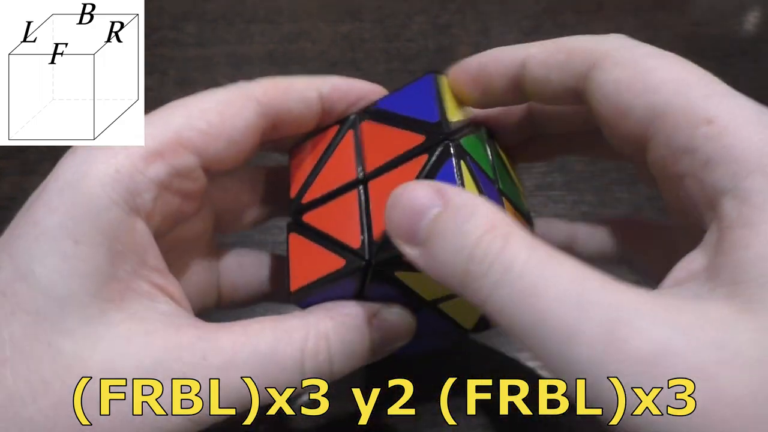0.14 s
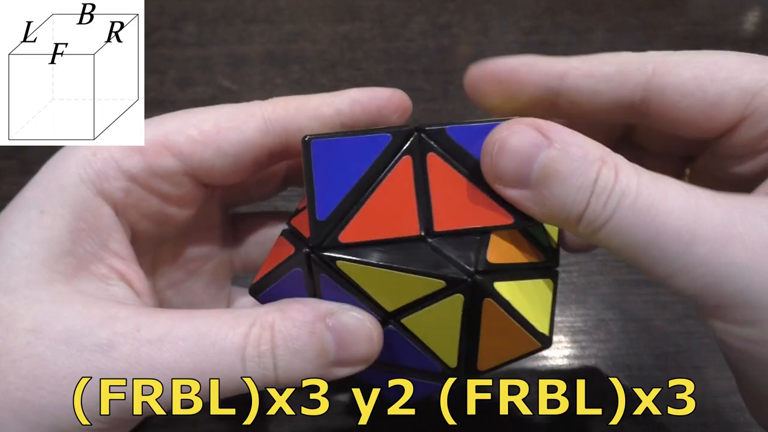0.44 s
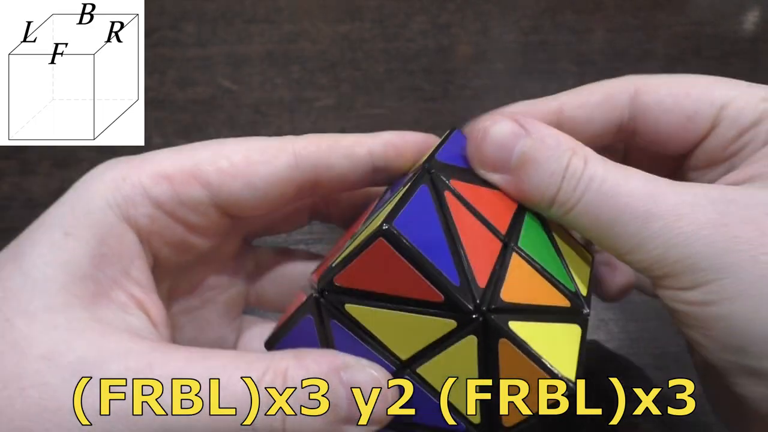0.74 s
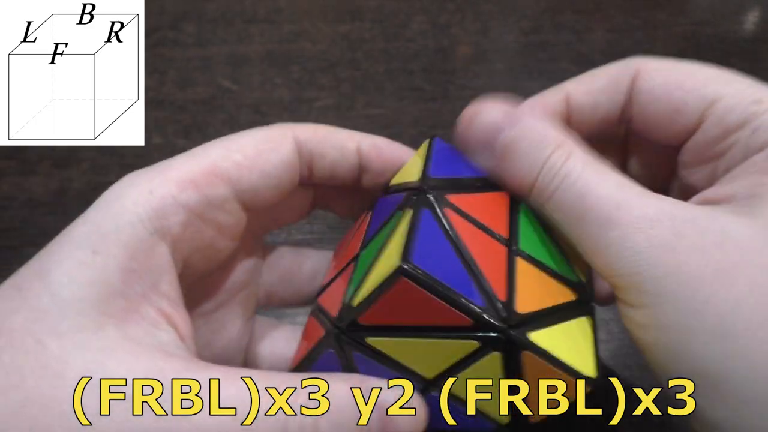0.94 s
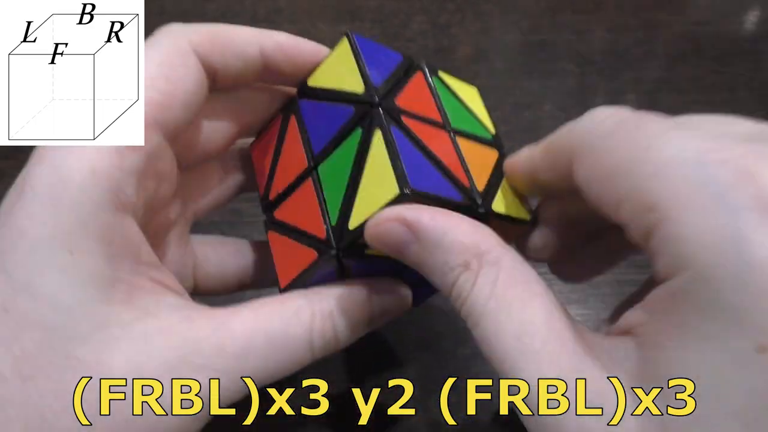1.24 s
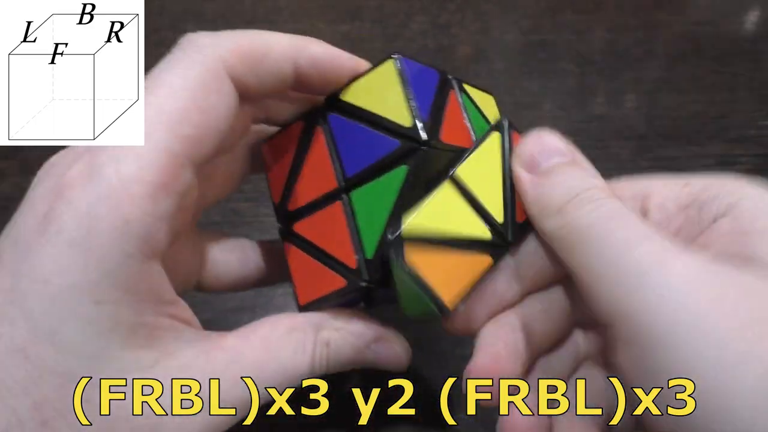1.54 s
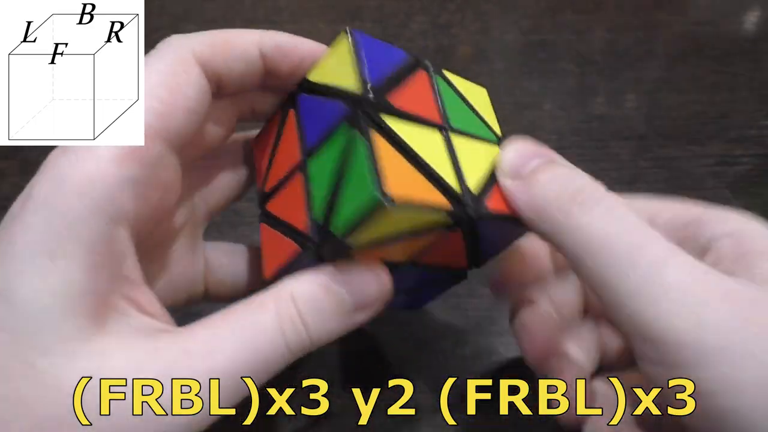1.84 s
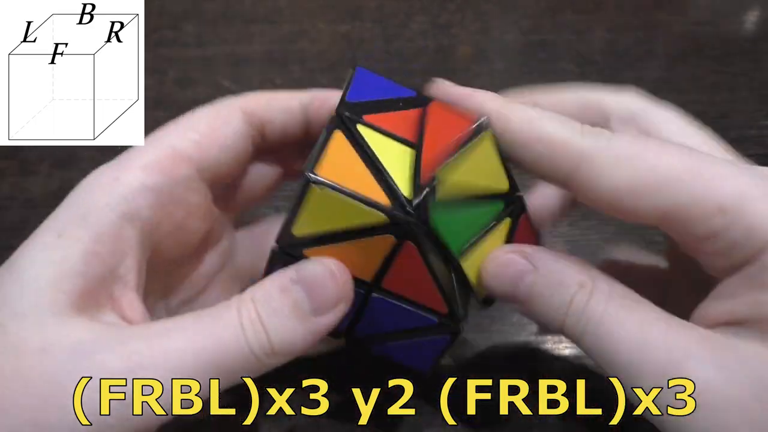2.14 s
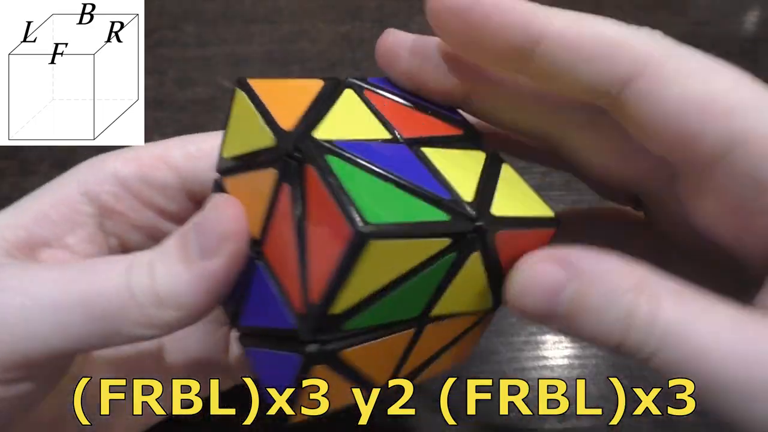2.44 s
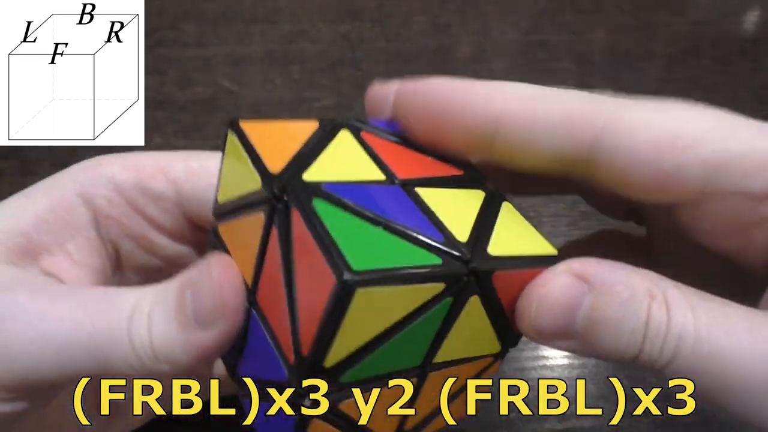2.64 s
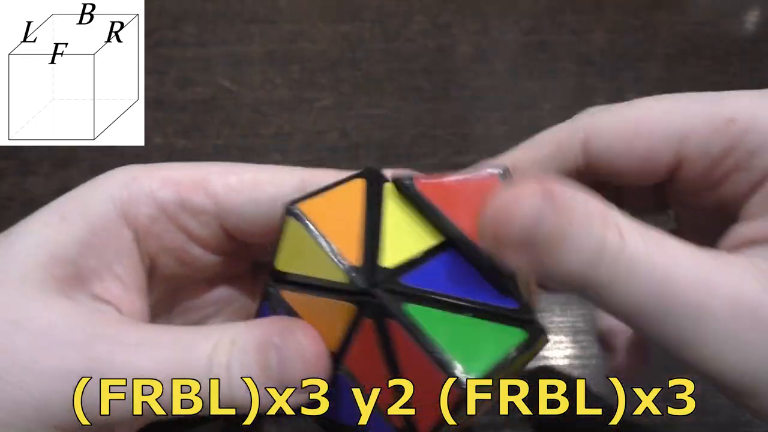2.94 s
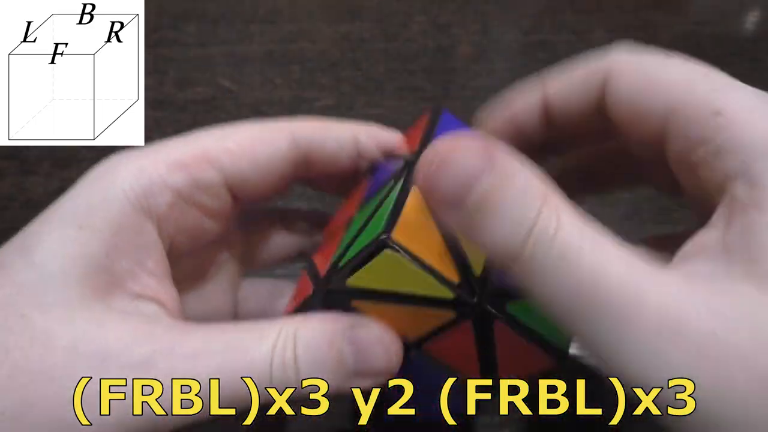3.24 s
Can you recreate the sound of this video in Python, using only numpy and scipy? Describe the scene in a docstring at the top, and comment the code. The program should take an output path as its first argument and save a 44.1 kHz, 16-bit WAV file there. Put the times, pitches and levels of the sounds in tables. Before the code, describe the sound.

A plastic twisty puzzle clacks and rattles in quick, uneven runs as hands turn it close to the microphone. Its sliding pieces scrape grittily, with a few tiny spring pings, over a quiet room's faint hiss and hum.

```python
"""Short chattering clacks and a gritty rattle: hands turn a plastic twisty puzzle, close by in a quiet room.
Pieces clack over each other; each chatter of tiny impacts rings their hollow bodies and sharp edges.
Sliding faces catch, rub and squeak thinly. Now and then a spring rings until a piece damps it.
Underneath, faint room hiss and mains hum, which drop after the loudest clack."""
import sys
import numpy as np
from scipy import signal
from scipy.fft import rfft, irfft
from scipy.io import wavfile
from scipy.ndimage import uniform_filter1d

SR = 44100
rng = np.random.default_rng(int(sys.argv[2]) if len(sys.argv) > 2 else 0)


def put_to_file(sound):
    """Save the sound as 16-bit audio at rate SR, in the file named by the first command-line argument."""
    columns = np.atleast_2d(sound).T  # one column per channel
    safe = np.clip(columns, -1, 1)
    whole_steps = np.round(safe * 32767)
    wavfile.write(sys.argv[1], SR, whole_steps.astype(np.int16))


N = 149940

# pieces clacking: start_s, body_db, edge_db
CLACK_HITS = [(0.0947, -30.5, -33.5), (0.1482, -32, -49), (0.2304, -15.5, -17.5), (0.2498, -20.5, -26),
              (0.2569, -18.5, -12.5), (0.2666, -11.5, -19.5), (0.3594, -34, -34), (0.3718, -26.5, -28),
              (0.4111, -23, -27), (0.448, -17.5, -35), (0.452, -18, -25), (0.4575, -21, -29),
              (0.495, -25, -34), (0.5352, -24.5, -32.5), (0.59, -18, -26), (0.5982, -25, -24.5),
              (0.652, -24, -43), (0.6662, -23, -21.5), (0.7518, -32, -35), (0.7706, -20.5, -33.5),
              (0.86, -24.5, -35), (0.8715, -23.5, -31), (0.8821, -18.5, -24.5), (1.0377, -14.5, -18),
              (1.0842, -23, -35.5), (1.1419, -40, -31), (1.3018, -41.5, -58), (1.3529, -24, -33.5),
              (1.3716, -25, -28.5), (1.4021, -18.5, -30), (1.423, -16.0, -21.5), (1.449, -24.5, -35),
              (1.476, -23.5, -32), (1.507, -23.5, -38), (1.544, -11, -15.5), (1.5565, -17, -22),
              (1.6362, -21, -25), (1.7385, -20, -25), (1.756, -21, -27), (1.8527, -21.5, -28.5),
              (1.861, -23.5, -28.5), (1.9437, -30, -41), (1.9655, -23.5, -28.5), (2.0723, -20.5, -22.5),
              (2.076, -19, -15.5), (2.1175, -18.5, -23), (2.1301, -16, -16), (2.2161, -25, -29.5),
              (2.2338, -20, -23.5), (2.249, -23, -31), (2.288, -26.5, -30), (2.3104, -19.5, -28),
              (2.3468, -21.5, -34), (2.413, -27.5, -40), (2.461, -16.5, -12.5), (2.659, -30, -71),
              (2.6911, -21, -28.5), (2.731, -28.5, -37.0), (2.7564, -15.5, -22), (2.797, -15, -14.5),
              (2.8044, -21.5, -31), (2.8597, -19, -22), (2.868, -11.5, -11), (2.8832, -30, -19),
              (3.0048, -28.5, -30.5), (3.074, -30.5, -38.5), (3.106, -29.5, -31), (3.1305, -26, -31.5),
              (3.146, -42, -30), (3.2046, -29.5, -30), (3.2341, -29, -43), (3.2904, -35, -51)]
# hollow body resonances: pitch_hz, width_hz, level_db
BODY_MODES = [(715, 125, -10), (1085, 101.5, 0), (1800, 499, 3.5), (2304, 984, 0), (3300, 2110, -6)]
# sharp edge resonances: pitch_hz, width_hz, level_db
EDGE_MODES = [(4820, 1500, 1.5), (8190, 4760, 5), (9950, 1630, 10.5), (12900, 1620, 2)]
# faces sliding through a turn: start_s, end_s, level_db
FACE_SLIDES = [(0.233, 0.279, -30.5), (0.331, 0.494, -34), (0.583, 0.642, -40), (0.655, 0.759, -32),
               (0.858, 1.14, -49), (1.397, 1.59, -37), (1.635, 1.762, -33), (2.069, 2.171, -37),
               (2.195, 2.335, -32), (2.753, 2.941, -40.5), (2.963, 3.231, -38)]
# springs set ringing: start_s, pitch_hz, level_db, damped_after_s
SPRING_RINGS = [(.412, 2155, -15, 0.0056), (0.454, 6500, -44, .1), (.490, 3450, -29.5, 0.028),
                (0.507, 1800, -34, 0.035), (2.351, 7240, -38.5, 0.08), (2.352, 4810, -42, .055),
                (2.829, 1962, -15.5, 0.018)]
# room decay: freq_hz, t60_s
ROOM_DECAY = [(2000, 0.18), (10000, 0.13)]
# room hiss spectrum: freq_hz, relative_density_db
HISS_SPECTRUM = [(30, -17.5), (160, 0), (355, -3), (600, -18.5), (1000, -7), (2400, -12.5), (4000, -25.5),
                 (8500, -32), (9500, -24), (16000, -28)]
# mains hum: pitch_hz, level_db
HUM_TONES = [(150, -48.5), (197, -55.5)]

DETUNE_SHARE, SCATTER_DB = 0.04, 2
CHATTER_S, SHORTEN_PER_DB, RISE_SHARE, SPIKE_DB, BODY_CUTOFF_HZ = 0.0039, 0.05, 0.17, 5, 5360
THUMP_HZ, THUMP_DB, THUMP_KNEE_DB = 350, -22, -9
CATCHES_PER_S, CATCH_SPREAD_DB, SLIDE_FADE_S, SLIDE_RELEASE_S = 550, 5.5, 0.012, 0.027
RUB_DB, RUB_BODY_DB, RUB_FLICKER_DB = -9, 6.5, 3
SQUEAK_PITCHES_HZ, SQUEAK_WIDTH_HZ, SQUEAK_DB = (3450, 3856, 5320, 6525), 65, -10.5
SPRING_ATTACK_S, SPRING_T60_S, SPRING_DAMP_S, SPRING_ROUGH_DB = 0.0013, 0.23, 0.008, 2
ROOM_DB, HISS_DB, HUM_WAVER_DB, HUM_WAVER_RAD = -11.5, -47, 1, 0.48
DROP_AT_S, DROP_DB, SETTLE_DB, SETTLE_S = 2.885, -24, -5, 0.027
LEFT_EAR_DB, PAN_SPREAD_DB, BAND_LIMIT_HZ = -0.29, 2, 16300


def clack(body_db, edge_db):
    """A chatter of tiny impacts rings body and edges; hard clacks thump the whole puzzle."""
    t = np.arange(1024) / SR
    body_noise, edge_noise, spike_noise = rng.standard_normal((len(t), 3)).T
    scatter = np.clip(rng.standard_normal((len(BODY_MODES + EDGE_MODES), 2)), -2, 2)
    sharpness_db = np.clip(edge_db - body_db + 8, -10, 20)
    length_s = CHATTER_S * np.exp(-SHORTEN_PER_DB * sharpness_db)
    swell = np.minimum(t / (RISE_SHARE * length_s), 1) * np.exp(-(t / length_s) ** 2)
    push = swell * flicker(spike_noise, SPIKE_DB, 10)
    body = resonate(whiten(push * body_noise), BODY_MODES, scatter)
    body = signal.lfilter(*signal.butter(2, BODY_CUTOFF_HZ, fs=SR), body)  # soft push, little treble
    edge = resonate(whiten(push * edge_noise), EDGE_MODES, scatter[len(BODY_MODES):])
    pulse = np.gradient(t ** 2 * np.exp(-2 * np.pi * THUMP_HZ * t)) * SR * 20 * THUMP_HZ
    thump = pulse * gain(THUMP_DB + 2 * min(body_db - THUMP_KNEE_DB, 0))
    return gain(body_db) * body / peak_rms(body) + gain(edge_db) * edge / peak_rms(edge) + thump


def slide():
    """Sliding faces rub and catch at random; each catch is a tiny clack."""
    t = np.arange(N) / SR
    motion = np.zeros(N)
    for start_s, end_s, level_db in FACE_SLIDES:
        attack = np.clip((t - start_s) / SLIDE_FADE_S + 0.5, 0, 1)
        release = np.exp(-np.maximum(t - end_s, 0) / SLIDE_RELEASE_S)
        motion += gain(level_db) * attack * release
    strength = gain(CATCH_SPREAD_DB * np.minimum(rng.exponential(1, N), 3))
    catches = strength * (rng.random(N) < CATCHES_PER_S / SR)
    kind = rng.integers(0, 24, N)
    grit = sum(signal.oaconvolve(catches * (kind == k), clack(-50.5, -59.5))[:N] for k in range(24))
    friction = unit_rms(grit) + gain(RUB_DB) * rub()
    squeaks = squeak(motion * catches, kind)
    squeaks *= np.linalg.norm(motion) / np.linalg.norm(squeaks)
    return motion * friction + gain(SQUEAK_DB) * squeaks


def rub():
    """Flickering friction noise rings body and edges."""
    noise = rng.standard_normal(N) * flicker(rng.standard_normal(N), RUB_FLICKER_DB, 300)
    no_scatter = np.zeros((9, 2))
    body = unit_rms(resonate(noise, BODY_MODES, no_scatter))
    edge = unit_rms(resonate(noise, EDGE_MODES, no_scatter))
    return unit_rms(gain(RUB_BODY_DB) * body + edge)


def squeak(catches, kind):
    """Catches set off thin tones, three detuned variants per pitch."""
    out = np.zeros(N)
    for k, pitch_hz in enumerate(3 * SQUEAK_PITCHES_HZ):
        scatter = 0.5 * rng.standard_normal((1, 2))
        out += resonate(catches * (kind == k), [(pitch_hz, SQUEAK_WIDTH_HZ, 0)], scatter)
    return out


def springs():
    """Narrow, slightly rough tones fade until a piece damps them."""
    out = np.zeros(N)
    for start_s, pitch_hz, level_db, damped_after_s in SPRING_RINGS:
        t = np.arange(0, damped_after_s + SPRING_DAMP_S, 1 / SR)
        envelope = np.minimum(t / SPRING_ATTACK_S, 1) * gain(level_db - 60 * t / SPRING_T60_S)
        damping = np.clip(1 + (damped_after_s - t) / SPRING_DAMP_S, 0, 1)
        rough = flicker(rng.standard_normal(len(t)), SPRING_ROUGH_DB, 60)
        add(out, start_s, envelope * damping * rough * np.sin(2 * np.pi * pitch_hz * t))
    return out


def room(x):
    """Sparse reflections of random sign; each band dies at its own rate."""
    taps = np.zeros((2, SR // 2))
    grid = np.arange(200, SR // 2 - 20, 20)
    delays = grid + rng.integers(0, 20, (2, len(grid)))
    np.put_along_axis(taps, delays, rng.choice([-1., 1.], delays.shape), 1)
    taps += taps.sum(0)  # both ears share much of the tail
    freq_hz, t, bands = signal.stft(taps, SR, nperseg=128)
    decay = gain(-60 * t / curve_at(ROOM_DECAY, freq_hz)[:, None])
    tail = signal.istft(bands * decay, SR, nperseg=128)[1]
    return signal.fftconvolve(x[None], tail / np.linalg.norm(tail[0]), axes=1)[:, :N]


def hiss(correlation=0.62):
    """Bass-heavy room noise, partly shared by both ears."""
    left, other = rng.standard_normal((2, N))
    right = correlation * left + np.sqrt(1 - correlation ** 2) * other
    shape = gain(curve_at(HISS_SPECTRUM, np.fft.rfftfreq(N, 1 / SR)))
    return gain(HISS_DB) * unit_rms(irfft(rfft([left, right]) * shape, N))


def hum():
    """Mains hum, wavering in level and phase."""
    t = np.arange(N) / SR
    out = np.zeros(N)
    for pitch_hz, level_db in HUM_TONES:
        sag, drift = (unit_rms(signal.oaconvolve(noise, np.hanning(3000), "same"))
                      for noise in rng.standard_normal((2, N)))
        phase_rad = 2 * np.pi * pitch_hz * t + HUM_WAVER_RAD * drift
        out += gain(level_db - HUM_WAVER_DB * sag) * np.sin(phase_rad)
    return out


def background_drop():
    """Gain that dips briefly, then settles below its starting level."""
    t = np.arange(N) / SR
    dip = np.exp(-np.maximum(t - DROP_AT_S, 0) / SETTLE_S)
    level_db = (t > DROP_AT_S) * (SETTLE_DB + (DROP_DB - SETTLE_DB) * dip)
    return gain(uniform_filter1d(level_db, size=200))


def resonate(x, modes, scatter):
    """Parallel resonances of alternating sign; scatter shifts each pitch and level."""
    f = np.fft.rfftfreq(len(x), 1 / SR)
    response = 0
    for k, ((pitch_hz, width_hz, level_db), (detune, boost)) in enumerate(zip(modes, scatter)):
        centre_hz = pitch_hz * (1 + DETUNE_SHARE * detune)
        weight = (-1) ** k * gain(level_db + SCATTER_DB * boost)
        loss = 1j * f * width_hz
        response += weight * loss / (centre_hz ** 2 - f ** 2 + loss)
    return irfft(rfft(x) * response, len(x))


def whiten(burst):
    spectrum = rfft(burst)
    power = uniform_filter1d(abs(spectrum) ** 2, size=15)
    return irfft(spectrum / np.sqrt(power + 1e-20), len(burst))


def flicker(noise, depth_db, window_samples):
    return gain(depth_db * unit_rms(uniform_filter1d(noise, window_samples)))


def gain(db):
    return 10 ** (np.asarray(db) / 20)


def unit_rms(x):
    return x / np.sqrt(np.mean(x ** 2) + 1e-20)


def peak_rms(x):
    return np.sqrt(uniform_filter1d(x ** 2, size=150).max())


def curve_at(points, freq_hz):
    knots_hz, values = np.transpose(points)
    return np.interp(np.log(freq_hz + 1), np.log(knots_hz + 1), values)


def add(mix, start_s, sound):
    part = mix[round(start_s * SR):][:len(sound)]
    part += sound[:len(part)]


def scene():
    """Puzzle almost centred, a touch to the right; each clack at its own place; room, hiss and hum."""
    puzzle = np.tile(springs() + slide(), (2, 1))
    pans_db = PAN_SPREAD_DB * rng.standard_normal(len(CLACK_HITS))
    for (start_s, body_db, edge_db), pan_db in zip(CLACK_HITS, pans_db):
        sound = clack(body_db, edge_db)
        for ear, side in zip(puzzle, (0.5, -0.5)):
            add(ear, start_s, sound * gain(side * pan_db))
    reverb = gain(ROOM_DB) * room(puzzle.mean(0))
    background = (hiss() + hum()) * background_drop()
    return puzzle * gain([[LEFT_EAR_DB], [0]]) + reverb + background


def record(dry):
    """Clip at full scale, then low-pass."""
    lowpass = signal.firwin(511, BAND_LIMIT_HZ, window=("kaiser", 9), fs=SR)
    return signal.oaconvolve(np.clip(dry, -1, 1), lowpass[None], "same")


dry = scene()
out = record(dry)
put_to_file(out)
```